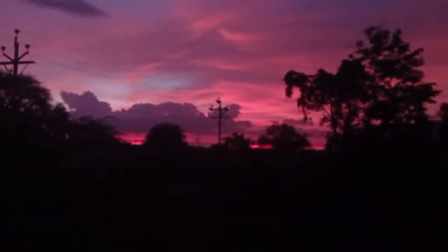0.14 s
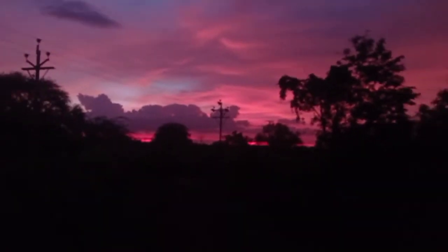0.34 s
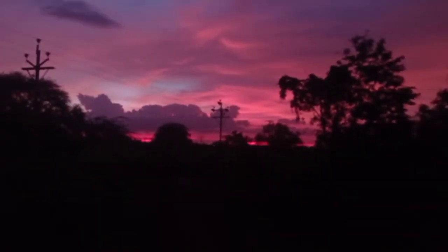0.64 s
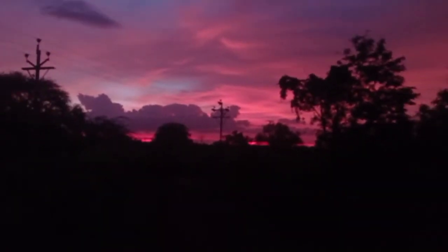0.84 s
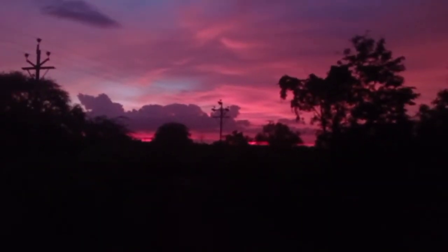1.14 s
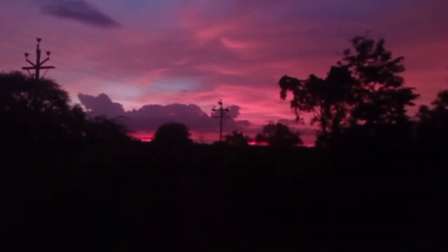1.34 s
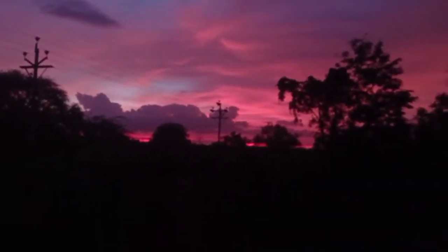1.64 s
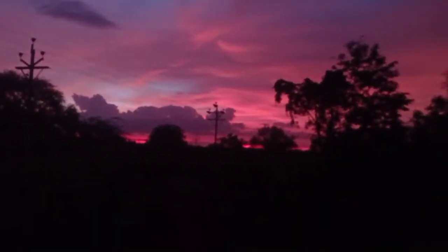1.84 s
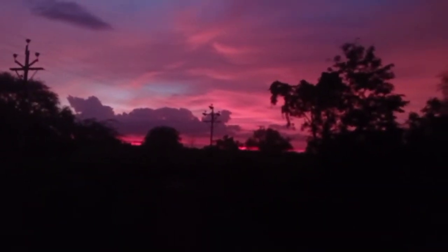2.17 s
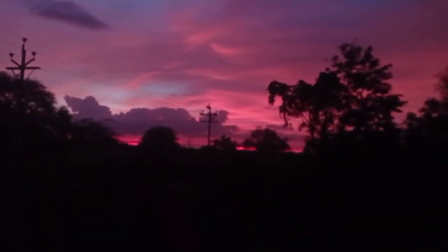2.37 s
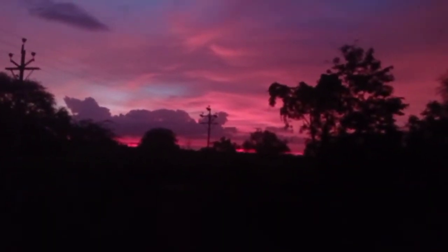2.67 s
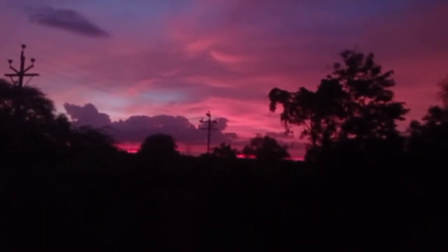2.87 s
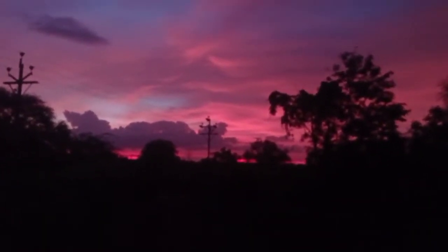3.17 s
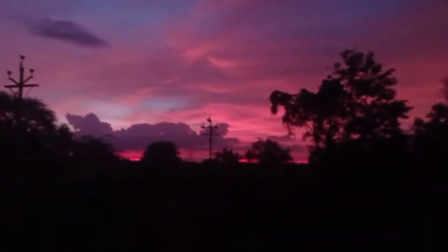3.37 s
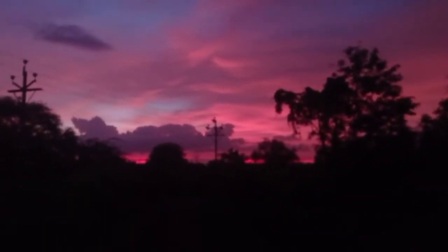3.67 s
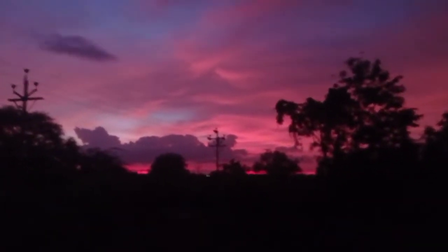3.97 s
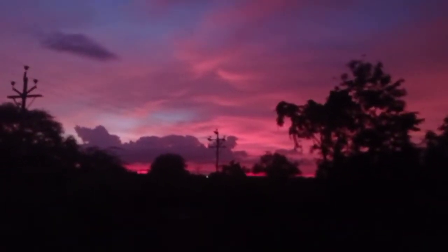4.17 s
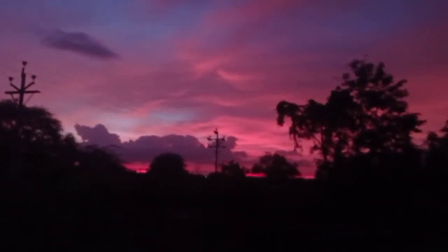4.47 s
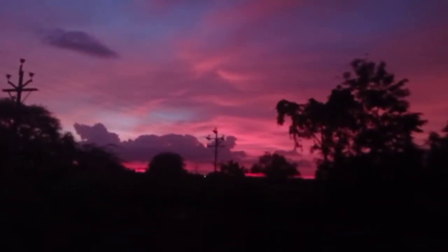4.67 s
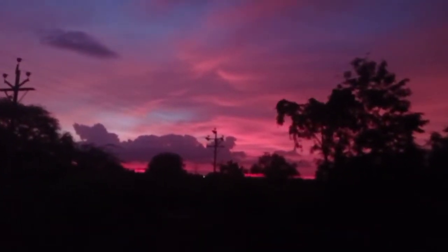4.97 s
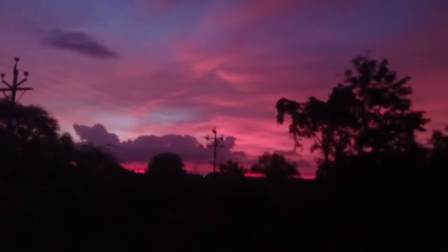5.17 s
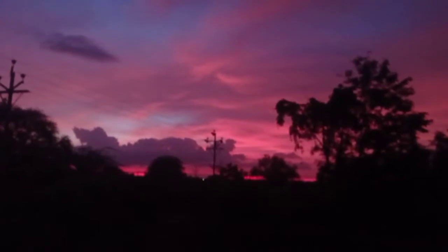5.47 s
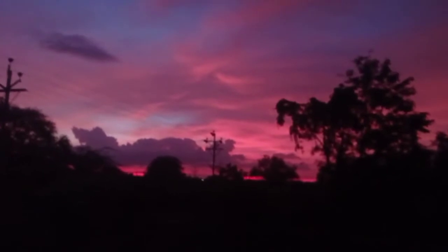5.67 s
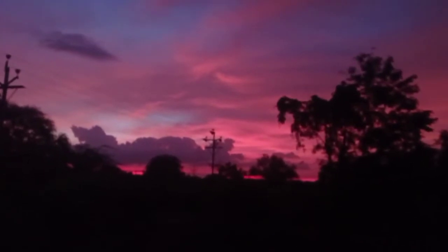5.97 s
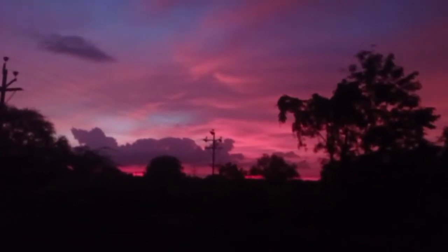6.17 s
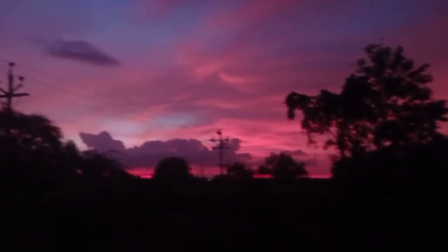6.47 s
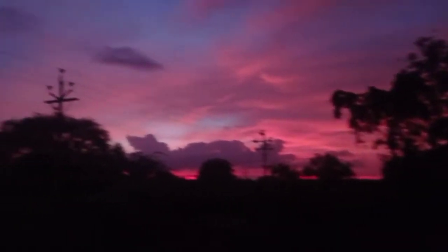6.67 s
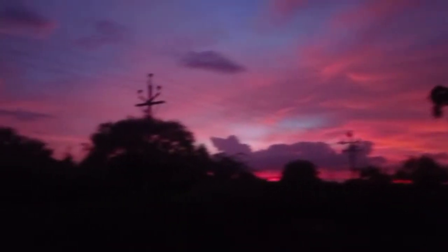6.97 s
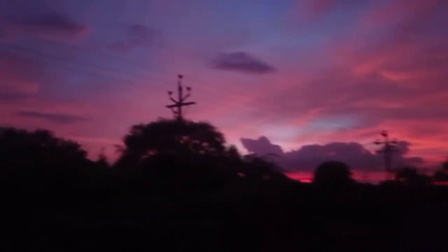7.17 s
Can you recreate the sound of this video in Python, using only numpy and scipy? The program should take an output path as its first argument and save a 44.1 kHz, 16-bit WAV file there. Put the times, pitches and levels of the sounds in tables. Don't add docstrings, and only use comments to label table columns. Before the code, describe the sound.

Outdoor evening birdsong: soft distant calls and a short buzzing gurgle, then a loud, close, high trill repeating ten notes a second to the end.

```python
import sys
import numpy as np
from scipy import signal
from scipy.fft import rfft, irfft
from scipy.io import wavfile
from scipy.ndimage import uniform_filter1d

SR = 44100
rng = np.random.default_rng(int(sys.argv[2]) if len(sys.argv) > 2 else 0)


def gain_from_db(level_db):
    decades = np.asarray(level_db, float) / 20
    return 10 ** decades


def generate_wav(signal):
    frames = np.transpose(np.atleast_2d(signal))
    scaled = np.clip(frames, -1, 1) * 32767
    pcm = np.round(scaled).astype(np.int16)
    wavfile.write(sys.argv[1], SR, pcm)


N = 323253


def add(out, at_s, x, pan_db):
    i = int(round(at_s * SR))
    x = x[max(-i, 0):max(N - i, 0)]
    start = max(i, 0)
    out[:, start:start + len(x)] += x * gain_from_db(np.array([[pan_db], [-pan_db]]) / 2)


def wander(n, rate):
    k = max(int(SR / rate), 1)
    steps = np.repeat(rng.standard_normal(n // k + 1), k)
    return 1.55 * uniform_filter1d(uniform_filter1d(steps, k), k)[:n]


def shaped(db_of_hz):
    hz = np.maximum(np.fft.rfftfreq(N, 1 / SR), 1)
    x = irfft(rfft(rng.standard_normal(N)) * gain_from_db(db_of_hz(hz)), N)
    return x / x.std()


def trace(s, *columns):
    t = np.arange(s[0], s[-1], 1 / SR)
    return [uniform_filter1d(np.interp(t, s, c), size=40) for c in columns]


def syrinx(hz, db, overtones_db, rough_db=2.5, waver=0.0041, tilt_db=0, grain_db=-60):
    beak_top_hz, beak_fall_db_per_khz = 13500, 5
    n = len(hz)
    turn = 2 * np.pi * np.cumsum(hz * (1 + waver * wander(n, 300))) / SR + 6 * rng.random()
    tone = np.sin(turn) * (1 + gain_from_db(grain_db) * wander(n, 5000))
    for harmonic, over_db in enumerate(overtones_db, start=2):
        over_hz = harmonic * hz
        over_db = over_db - np.clip(over_hz - beak_top_hz, 0, None) * beak_fall_db_per_khz / 1000
        over_db = over_db + tilt_db * np.log2(over_hz / 11000) + 3 * wander(n, 120)
        flicker = 1 + .4 * wander(n, 3000)
        tone += gain_from_db(over_db) * flicker * np.sin(harmonic * turn) * (over_hz < .4 * SR)
    return tone * gain_from_db(db + rough_db * wander(n, 250))


def near_singer(out):
    # [t/ms, f/Hz, level/dB]
    rise_shape = [(-18, 5800, -40), (-14.5, 6030, -22.5), (-10, 6300, -9.5), (-7, 6950, -6.5),
                  (-3, 8700, -39), (-1.5, 7300, -12.5)]
    # [t/ms, f/Hz, level/dB]
    fall_shape = [(1.22, 5850, -2), (5.56, 5394, 0.5), (10.55, 5206, -0.5), (18.4, 5188, -7),
                  (25.55, 4966, -13), (35.88, 4289, -7.5), (45.25, 3598, -10.5), (54.2, 3195, -17),
                  (57.66, 3180, -22.5), (61, 2990, -35)]
    # [t/s, level/dB, shelf f/Hz, mid-fall f/Hz]
    soft_notes = [(0.002, -18.5, 5330, 4870), (4.072, -37.5, 5707, 4530), (4.172, -30.5, 5600, 4580),
                  (4.2752, -24, 5500, 4890), (4.3781, -22, 5610, 4600), (4.48, -19.5, 5400, 4860),
                  (4.5802, -17.5, 5400, 4820), (4.681, -16, 5410, 4610)]
    # [t/s, level/dB, shelf f/Hz, mid-fall f/Hz]
    full_notes = [(4.7791, -14.5, 5328, 4920), (4.8793, -14.5, 5190, 4693), (4.9784, -14.5, 5360, 4790),
                  (5.0807, -14, 5430, 4596), (5.1792, -14, 5330, 4680), (5.2773, -13.5, 5288, 4270),
                  (5.373, -13.5, 5290, 4380), (5.4724, -13.5, 5350, 4500), (5.5702, -13.5, 5250, 4450),
                  (5.6672, -13, 5220, 4510), (5.764, -14, 5280, 4640), (5.8635, -14, 5300, 4510),
                  (5.9617, -14, 5290, 4490), (6.0596, -14, 5380, 4580), (6.159, -13, 5355, 4950),
                  (6.26, -14.5, 5260, 4473), (6.3608, -14, 5350, 4680), (6.4628, -14, 5289, 4600),
                  (6.565, -13, 5260, 4495), (6.664, -13, 5365, 4512), (6.762, -15, 5510, 4880),
                  (6.8632, -13.5, 5290, 4586), (6.9642, -13.5, 5230, 4620), (7.0683, -13.5, 5390, 4330),
                  (7.1674, -14, 5250, 4630), (7.2729, -14.5, 5400, 4460)]
    # [break delay/ms, end delay/ms, rise level/dB]
    note_timing = [(-0.18, 0.5, 0), (-0.85, -3, 8), (-0.2, 0, 5.5), (-1.85, 5, 3), (0, 0.5, 1),
                   (1.2, -1.5, 3), (0.7, -0.2, 0), (0, -0.3, 1), (-0.2, 1, -0.5), (-0.5, 0, -0.5),
                   (0.28, 1, 1), (0.3, -1.6, 4), (0.1, 0, 2), (-.5, -4.5, 1.5), (0.7, -0.8, 0),
                   (-0.2, -1.8, 1.5), (-0.27, -2.5, 4), (-0.73, -1.8, 0), (-0.5, 1, 0.5), (0.5, -1, -1),
                   (-0.8, -2.5, 1.5), (-0.6, -1, 2), (-0.43, -1.5, 0), (-2.7, 1.5, 2), (0.3, 1.57, 0.5),
                   (-.9, 0.5, 2.5), (0.5, -1.3, 0), (-2.5, 0, 1.5), (1, 0, 1.5), (-1.96, -0.2, 0),
                   (-0.5, 1, -2), (0.34, -2.5, 0.5), (-0.5, 2.5, 1), (-3.5, 0, 5.5)]
    overtones_db, overtone_scatter_db = (-39, -49), 4
    ms, hz, db = np.transpose(rise_shape + fall_shape)
    rising, breaking = ms < -4, hz > 8000
    for note, timing in zip(soft_notes + full_notes, note_timing):
        s, note_db, shelf_hz, fall_hz = note
        break_ms, end_ms, rise_db = timing
        soft_db = max(-11.5 - note_db, 0)

        end_shift = np.clip((ms - 31) / 25, 0, None) * end_ms
        break_shift = break_ms * np.clip(1 - np.abs(ms + 4) / 14, .3, 1) * (ms < 0)
        late = ms + end_shift + break_shift

        bend = np.interp(ms, [0, 13, 31, 45, 56], [1, shelf_hz / 5240, fall_hz / 4630, 1, 1])
        soft_bend = 0.009 * np.interp(ms, [31, 50, 61], [0, 1, .6]) - 0.001 * breaking + 0.0014 * rising
        bend = bend + soft_db * soft_bend

        lift = np.clip((ms - 13) / 12, 0, 1) * 0.27 * soft_db
        lift = lift + 0.67 * soft_db * breaking
        lift = lift + (rise_db - 2.5) * rising
        pitch, level_db = trace(late / 1000, hz * bend, db + lift + note_db)
        over_db = np.add(overtones_db, 0.84 * soft_db + overtone_scatter_db * rng.standard_normal(2))
        song = syrinx(pitch, level_db, over_db, rough_db=.55, waver=.0025, tilt_db=22, grain_db=-42)
        add(out, s + late[0] / 1000, song * signal.windows.tukey(len(song), .05), 0)


def far_singer(out):
    # [t/ms, f/Hz, level/dB]
    far_shape = [(-13, 7800, -25), (-3.5, 8900, -23.5), (1.5, 6900, -6), (6, 6520, -2), (14, 6440, -9),
                 (21.5, 6700, -18), (42.5, 4400, -6), (53, 3780, -14.5), (62, 3770, -22)]
    far_times = [1.029, 1.132, 1.232, 1.333, 1.433, 1.5325, 1.629, 1.726, 1.823, 1.923, 2.023, 2.122, 2.221,
                 2.326, 2.426, 2.525, 2.624, 2.728, 2.827, 2.926, 3.0321, 3.141, 3.241, 3.346, 3.4546]
    # [t/s, level/dB]
    far_swell = [
        (1.03, -59),
        (1.63, -48),
        (2.05, -46),
        (3.0, -48),
        (3.46, -51),
    ]
    ms, hz, db = np.transpose(far_shape)
    for s in far_times:
        note_db = np.interp(s, *np.transpose(far_swell))
        note_hz = hz * (1 + 0.00788 * rng.standard_normal())
        pitch, level_db = trace(ms / 1000, note_hz, db + note_db)
        add(out, s + ms[0] / 1000, syrinx(pitch, level_db, (), rough_db=0.5), -5.0)


def slur(out, s, hz, db):
    flutter_hz, deepest_hz = 198, 240
    middle_hz, range_hz, stops_hz_per_ms = 5400, 950, 170
    hz, db = trace(s, hz, db)
    slide_hz_per_ms = np.gradient(hz) * SR / 1000
    depth = np.exp(-((hz - middle_hz) / range_hz) ** 2 - (slide_hz_per_ms / stops_hz_per_ms) ** 2)
    rate = flutter_hz * (1 + 0.032 * wander(len(hz), 32))
    flutter = np.sin(2 * np.pi * np.cumsum(rate) / SR)
    over_db = -34 + 15 * depth
    note = syrinx(hz + deepest_hz * depth * flutter, db, [over_db], rough_db=1.1, waver=0.0024)
    add(out, s[0], note * signal.windows.tukey(len(hz), .12), -.6)


def hooked_slurs(out):
    # [t/ms, f/Hz, level/dB]
    hook_shape = [(-64, 4100, -15.5), (-48, 5850, -5.5), (-29, 5200, -1.5), (-11.5, 5600, 1.5),
                  (-5.5, 6690, -4.5), (1.5, 7230, -5), (9, 5200, -6), (16, 4280, -3), (36, 4110, -18)]
    # [peak t/s, level before peak/dB, level after peak/dB]
    hook_events = [(0.934, -55.5, -46.5), (1.401, -49.5, -43), (2.024, -46.5, -47), (2.616, -46, -49.5)]
    ms, hz, db = np.transpose(hook_shape)
    for s, lead_db, drop_db in hook_events:
        slur(out, s + ms / 1000, hz, db + np.where(ms < 0, lead_db, drop_db))


def arches(out):
    # [crest t/s, slide/ms, crest f/Hz, foot f/Hz, level/dB]
    arch_events = [(0.988, 50, 6300, 4300, -52), (1.054, 31, 6120, 3940, -47.5),
                   (1.455, 28.3, 5680, 4974, -47.5), (1.517, 28.9, 6500, 3940, -48),
                   (2.073, 39.6, 6860, 4180, -46.5), (2.134, 34, 6430, 4102, -53),
                   (2.674, 18.4, 5930, 4900, -49.5), (2.695, 52, 6000, 4840, -50),
                   (2.745, 34, 5550, 4000, -52)]
    climb_ms, climb_hz, crest_db, foot_db = 8, 896, -7, -5
    floor_hz, turn_hz = 4200, 400
    for s, slide_ms, crest_hz, foot_hz, db in arch_events:
        turns = foot_hz > floor_hz
        ms = np.array([-climb_ms, 0, 0.15 * slide_ms, 0.61 * slide_ms, slide_ms])
        upper_hz = .75 * crest_hz + 0.23 * foot_hz
        lower_hz = foot_hz if turns else .15 * crest_hz + 0.92 * foot_hz
        hz = [crest_hz - climb_hz, crest_hz, upper_hz, lower_hz, foot_hz + turns * turn_hz]
        shape_db = np.array([1.3 * crest_db, crest_db, 0.58 * crest_db, 0, foot_db])
        slur(out, s + ms / 1000, hz, db + shape_db)


def chip(out, s, ms, from_hz, to_hz, db, pan_db, over_db):
    u = np.linspace(0, 1, int(ms * SR / 1000))
    note = syrinx(from_hz + (to_hz - from_hz) * u ** 2.33, db - 0.5, (over_db,), rough_db=2.5)
    swell = np.sin(np.pi * u ** 0.38) ** 0.33 * signal.windows.tukey(len(u), .2)
    add(out, s, note * swell, pan_db)


def chip_figures(out):
    # [t/ms, length/ms, pitch ratio, end/start pitch ratio, level/dB]
    figure_chips = [
        (-7.5, 12, .76, 0.63, -1.5),
        (1, 11, 0.995, 0.75, -0.5),
        (12.5, 11.7, 0.964, 0.78, 0.5),
        (25, 9.2, 1.088, 0.675, 3),
        (35, 8.6, 1.02, 0.55, -1.5),
    ]
    # [t/s, f/Hz, level/dB, fade per chip/dB, grace level/dB]
    figure_events = [(2.957, 5620, -48, -2.5, -30), (3.017, 5600, -54.5, 2.5, -25),
                     (3.095, 5444, -50, -0.5, -24), (3.176, 5230, -53, -1, -9.5),
                     (3.344, 5360, -52, 2, -30), (3.418, 5410, -48.5, 0, -6.5),
                     (3.502, 5180, -49.5, -3.5, -7.5), (3.638, 4640, -66.5, 1.5, -12.5),
                     (3.746, 5520, -48.5, 0, -31), (3.8187, 5170, -40, -3.5, -16)]
    for s, hz, db, fade_db, grace_db in figure_events:
        for k, (at_ms, ms, ratio, fall, chip_db) in enumerate(figure_chips):
            change_db = fade_db * (k - 1) if k else grace_db
            from_hz = ratio * hz
            chip(out, s + at_ms / 1000, ms, from_hz, fall * from_hz, db + chip_db + change_db, -.7, -21)


def ticks(out):
    # [t/s, length/ms, from f/Hz, to f/Hz, level/dB]
    tick_events = [(0.238, 9, 4330, 4300, -66), (0.253, 6.2, 5700, 6600, -69),
                   (0.429, 6.8, 4570, 5800, -50.5), (0.485, 4.5, 4400, 4500, -51),
                   (0.492, 8, 4460, 5400, -50.5), (.497, 6.7, 6130, 6200, -57.5)]
    for s, ms, from_hz, to_hz, db in tick_events:
        chip(out, s, ms, from_hz, to_hz, db, 15, -30)


def whistlers(out):
    # [t/s, length/ms, from f/Hz, to f/Hz, level/dB]
    gurgle_notes = [(1.565, 16.2, 1200, 1180, -62.5), (1.625, 147, 839.8, 820, -68.5),
                    (1.75, 32.6, 839, 885, -79), (1.806, 41, 2073, 2120, -63), (1.826, 33, 2084, 1980, -49),
                    (1.818, 36, 1810, 1720, -64), (1.855, 7.4, 1080, 1880, -66),
                    (1.862, 5.5, 1850, 2040, -51.5), (1.868, 125, 1867, 1910, -72.5),
                    (1.868, 79, 2120, 2190, -69), (1.885, 51, 5500, 5640, -65),
                    (1.885, 87, 5745, 6093, -64), (1.978, 16, 2220, 2670, -51),
                    (1.997, 28, 2490, 2510, -51), (2.024, 6.4, 2590, 5100, -44),
                    (2.029, 14.6, 3280, 3260, -38), (2.04, 13, 5800, 3400, -46)]
    # [t/s, length/ms, from f/Hz, to f/Hz, level/dB]
    distant_notes = [(0, 160, 2820, 2892, -71.5), (.135, 27, 2070, 2540, -68), (.284, 13, 3270, 3570, -53),
                     (.315, 10.7, 2530, 2416, -62), (.452, 19, 1700, 2300, -72),
                     (.48, 69, 2410, 2900, -71.5), (.526, 15, 3450, 3270, -48), (.537, 9, 3180, 2640, -60),
                     (.548, 9, 2600, 2860, -63), (.573, 16.7, 2380, 3100, -65), (.6, 24, 3000, 2850, -74),
                     (.553, 6.4, 2930, 2730, -53.5), (.565, 7, 2476, 2330, -54.5),
                     (.62, 40, 3270, 2483, -70), (.652, 42, 2495, 2354, -70), (1.05, 135, 2630, 2440, -74),
                     (4.245, 55, 3106, 3120, -59.5), (4.235, 10, 5600, 6100, -70),
                     (4.248, 5, 5400, 5200, -60), (4.26, 4, 5470, 4900, -58), (4.326, 11, 6440, 5060, -57),
                     (4.289, 36, 2600, 2350, -65), (4.44, 110, 2242, 2160, -75),
                     (4.745, 72, 2800, 2890, -68), (4.85, 72, 2700, 2430, -68),
                     (4.91, 61, 2072, 2500, -68.5), (5.3, 52, 2830, 3000, -59), (5.39, 72, 2896, 2930, -68),
                     (5.89, 50, 2240, 2400, -67.5), (7.018, 54, 3200, 3020, -58.5)]
    for notes, pan_db in ((gurgle_notes, 11.5), (distant_notes, 8)):
        for s, ms, from_hz, to_hz, db in notes:
            hz = np.linspace(from_hz, to_hz, int(ms * SR / 1000))
            note = syrinx(hz, db, (-50,), rough_db=2.5, waver=.005, tilt_db=-14)
            add(out, s, note * signal.windows.tukey(len(hz), .6), pan_db)


def buzz(out):
    # [t/s, level/dB, cycle rate/Hz]
    buzz_course = [(2.045, -49, 79), (2.085, -45, 77.1), (2.155, -46, 74.7), (2.265, -46, 73.1),
                   (2.375, -46, 72.7), (2.485, -48, 72.2), (2.595, -49, 70.5), (2.705, -50, 66.3)]
    # [share of cycle 0-1, f/Hz, level/dB]
    dive_voice = [(0, 2550, -5), (.08, 3050, 2), (.2, 3950, -10), (.31, 5600, -18), (.45, 4800, -8),
                  (.6, 3200, -5), (.72, 3850, -9), (.83, 3050, 1.5), (.93, 2220, -15)]
    # [share of cycle 0-1, f/Hz, level/dB]
    fill_voice = [(.1, 3100, -16), (.22, 2600, -11), (.32, 3050, -4), (.41, 2700, -10), (.47, 5300, -15),
                  (.6, 5050, -9), (.76, 5400, -10), (.85, 3900, -11), (.95, 3800, -6)]
    s, *columns = np.transpose(buzz_course)
    db, rate = trace(s, *columns)
    cycle = np.cumsum(rate) / SR + .17 + 0.015 * wander(len(db), 50)
    for voice, over_db in ((dive_voice, -62), (fill_voice, -75)):
        share, *shape = np.transpose(voice)
        hz, swing_db = (uniform_filter1d(np.interp(cycle, share, c, period=1), size=12) for c in shape)
        level_db = db + swing_db + 2.5
        note = syrinx(hz, level_db, (over_db,), rough_db=1.2, waver=.02, tilt_db=-45, grain_db=-26)
        add(out, s[0], note * signal.windows.tukey(len(db), .03), 7.0)


def hedges(x):
    # [delay t/s, left level/dB, right level/dB]
    echo_paths = [(0.021, -56, -54), (0.036, -50, -53), (0.093, -56, -54)]
    hedge_t60_s, hedge_db, hedge_gap_s = 0.07, -32, 0.00085
    field_t60_s, field_db, field_gap_s = .4, -32.5, 0.0095
    t = np.arange(int(.6 * SR)) / SR
    tail = rng.standard_normal((2, len(t))) * gain_from_db(-60 * t / hedge_t60_s) * np.clip(t / hedge_gap_s, 0, 1)
    tail *= gain_from_db([5 * wander(len(t), 110) for _ in range(2)])
    tail *= gain_from_db(hedge_db) / np.sqrt(np.sum(tail ** 2, axis=1, keepdims=True))

    field = rng.standard_normal(tail.shape) * gain_from_db(-60 * t / field_t60_s + 12 * wander(len(t), 47))
    field *= np.clip(t / field_gap_s, 0, 1)
    tail += field * gain_from_db(field_db) / np.sqrt(np.sum(field ** 2, axis=1, keepdims=True))
    for delay_s, left_db, right_db in echo_paths:
        tail[:, int(delay_s * SR)] += gain_from_db(np.array([left_db, right_db]))

    dull = signal.sosfilt(signal.butter(1, 7000, fs=SR, output="sos"), x)
    scattered = signal.fftconvolve(dull[None], tail, axes=1)[:, :N]
    return scattered * gain_from_db([4.5 * wander(N, 30) + db for db in (2.5, -1.5)])


def chorus():
    # [t/s, level/dB]
    chorus_course = [(0, -64), (.35, -74), (.45, -93), (.6, -72), (.9, -73), (1.1, -69), (1.7, -73),
                     (2.9, -71), (3.6, -102), (4.2, -70), (4.9, -75.5), (6, -65), (6.8, -78.5), (7.33, -68)]

    def bands(hz):
        return np.maximum(-12 * ((hz - 2450) / 220) ** 2, -12 * ((hz - 2900) / 160) ** 2 - 1.5)

    s, db = np.transpose(chorus_course)
    common = shaped(bands) * gain_from_db(2.8 * wander(N, 27))
    sides = np.array([common + shaped(bands) * gain_from_db(5.5 * wander(N, 28)) for _ in range(2)])
    return gain_from_db(np.interp(np.arange(N) / SR, s, db) - 12.0) * sides


def air():
    # [f/Hz, level per Hz/dB]
    air_curve = [(20, -2.5), (85, 3), (165, -5), (300, -2), (1300, -13), (2500, -11), (13300, -18.5),
                 (14800, -73.5)]
    # [f/Hz, side minus mid level/dB]
    side_curve = [(50, -14.5), (200, 0), (1000, -1), (16000, 0.5)]

    def curve(points, hz):
        at_hz, db = np.transpose(points)
        return np.interp(np.log(hz), np.log(at_hz), db)

    mid = shaped(lambda hz: curve(air_curve, hz))
    side = shaped(lambda hz: curve(air_curve, hz) + curve(side_curve, hz)) * gain_from_db(-2.0)
    return gain_from_db(-69) * (mid + side * np.array([[1], [-1]]))


def distant_hum(out):
    hum_hz, hum_db = 80, -73
    drone_hz, drone_width_hz, drone_db = 232.5, 35, -78
    thud_hz, thud_db = 22, -69
    turn = 2 * np.pi * np.cumsum(hum_hz + 1.3 * wander(N, 7.3)) / SR
    add(out, 0, gain_from_db(hum_db + 0.5 + 1.2 * wander(N, 8)) * np.sin(turn), 2.5)
    drone = shaped(lambda f: -10 * np.log10(1 + (2 * (f - drone_hz) / drone_width_hz) ** 4))
    add(out, 0, gain_from_db(drone_db) * drone, 2.5)
    t = np.arange(int(.16 * SR)) / SR
    for s in (1.24, 3.131, 5.01, 6.9):
        thud = gain_from_db(thud_db) * np.sin(2 * np.pi * thud_hz * t) * np.hanning(len(t))
        add(out, s - .08, thud, 5 * rng.standard_normal())


def shade_left(x):
    # [f/Hz, left minus right level/dB]
    shadow_curve = [(3200, -9), (4300, -12.5), (5200, -13.5), (5750, -23), (6300, -10), (6900, -7.5),
                    (9000, -7.5), (13000, -14.5)]
    hz, db = np.transpose(shadow_curve)
    early = np.roll(x, -1)
    return irfft(rfft(early) * gain_from_db(np.interp(np.fft.rfftfreq(N, 1 / SR), hz, db)), N)


def scene():
    near, far = np.zeros((2, 2, N))
    near_singer(near)
    near[0] = shade_left(near[0])
    for caller in (far_singer, hooked_slurs, arches, chip_figures, ticks, whistlers, buzz):
        caller(far)
    scattered = hedges(near[1] + gain_from_db(16) * far.mean(axis=0))
    background = chorus() + air()
    distant_hum(background)
    return near + far + scattered + background


def roll_off(x):
    return signal.sosfilt(signal.butter(12, 16200, fs=SR, output="sos"), x)


def record(dry):
    fizz_db, fizz_smear_s, top_hz = -38.5, 0.042, 15800
    power = uniform_filter1d(np.mean(dry ** 2, axis=0), int(fizz_smear_s * SR))
    loudness = np.sqrt(np.abs(power))
    high_pass = signal.butter(2, 500, "high", fs=SR, output="sos")
    fizz = signal.sosfilt(high_pass, rng.standard_normal(dry.shape))
    fizzy = dry + fizz * loudness * gain_from_db([fizz_db + 4 * wander(N, 35) for _ in range(2)])
    top_cut = signal.ellip(8, .2, 70, top_hz, fs=SR, output="sos")
    return roll_off(signal.sosfilt(top_cut, fizzy))


dry = scene()
out = record(dry)
generate_wav(out)
```